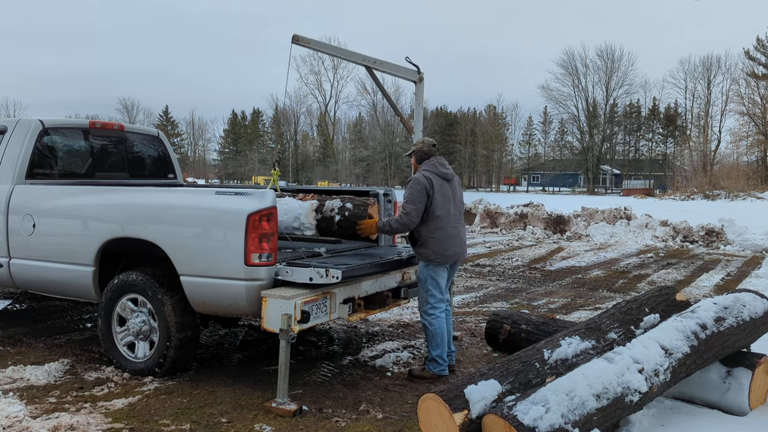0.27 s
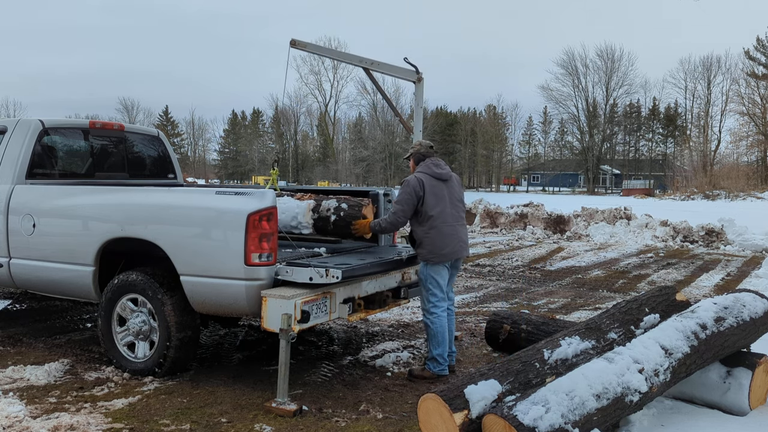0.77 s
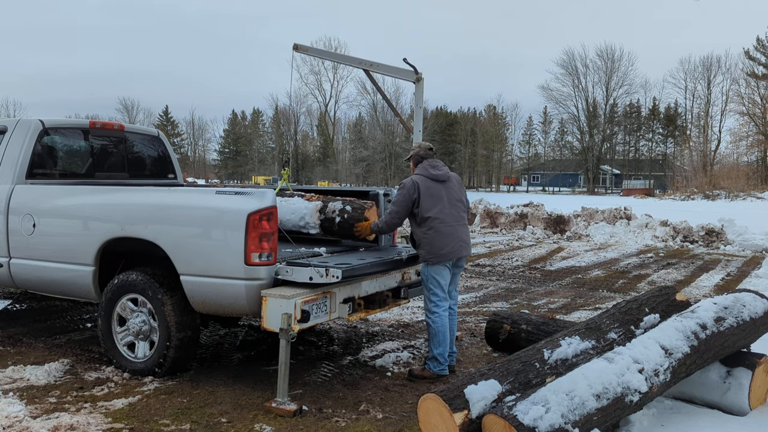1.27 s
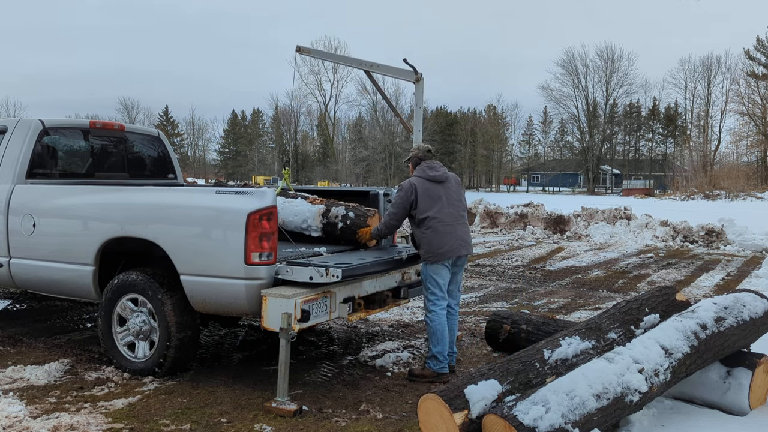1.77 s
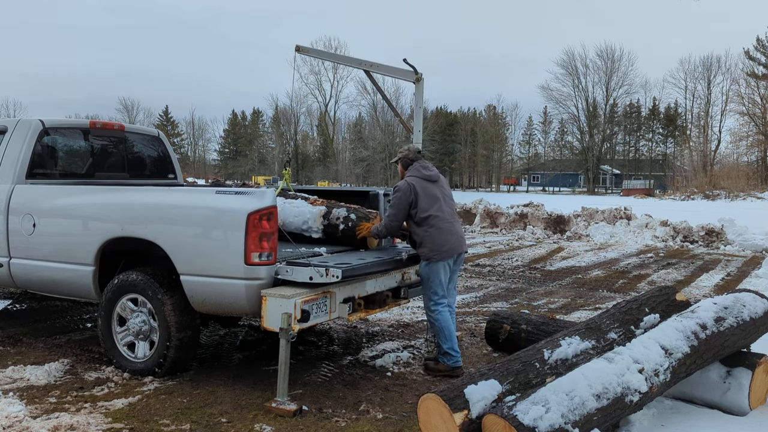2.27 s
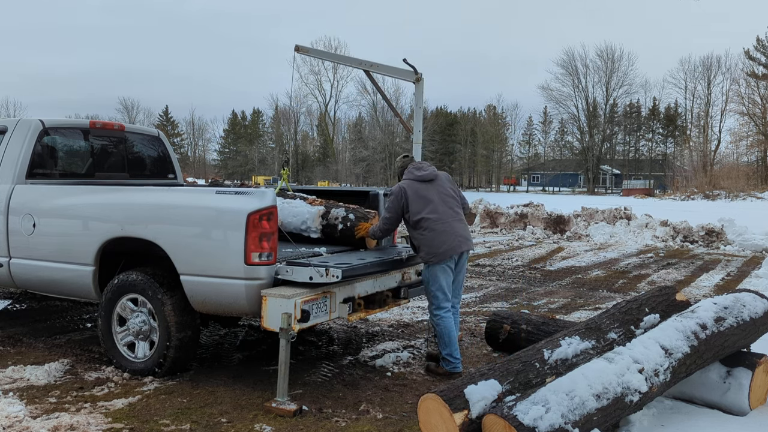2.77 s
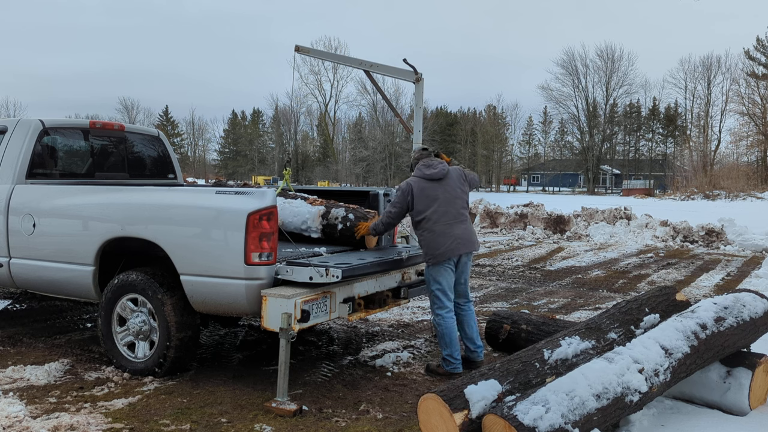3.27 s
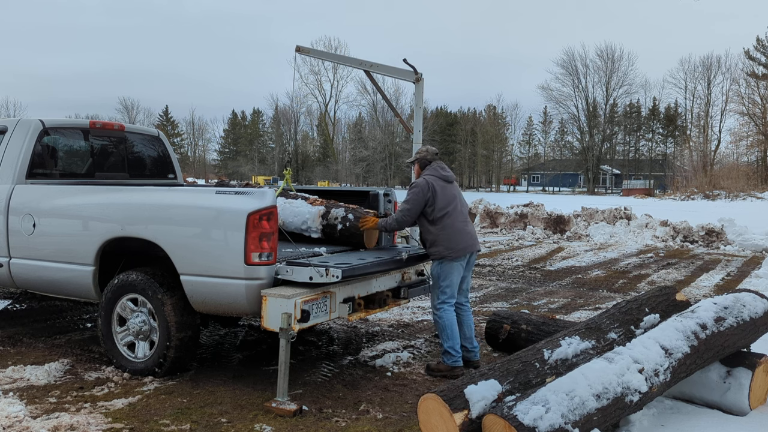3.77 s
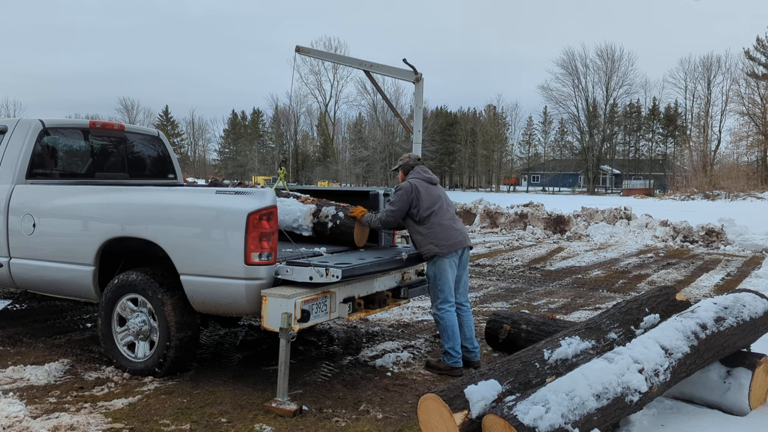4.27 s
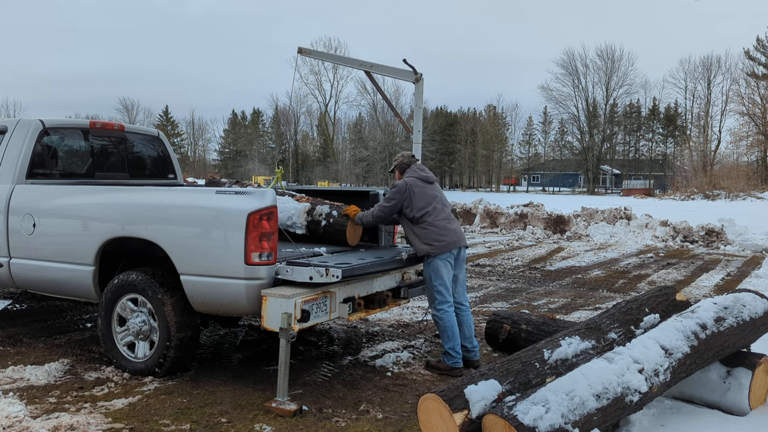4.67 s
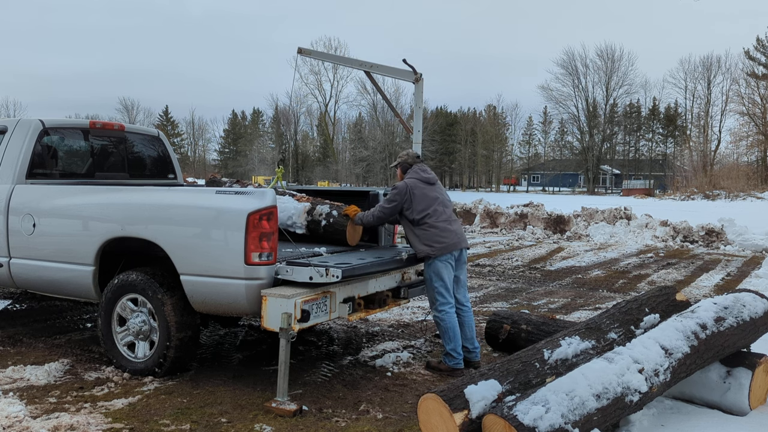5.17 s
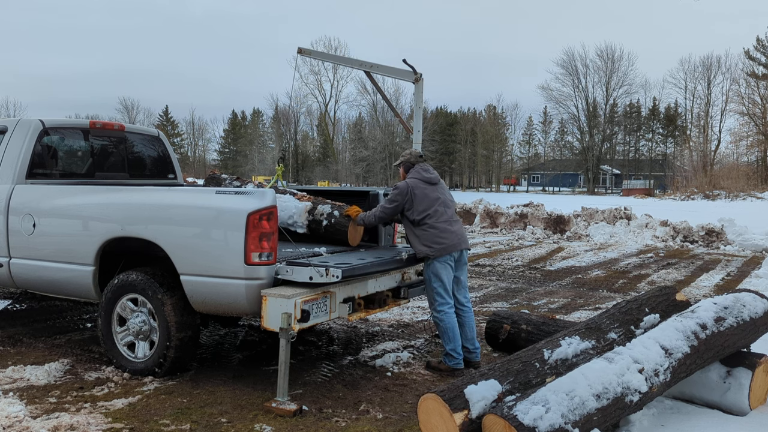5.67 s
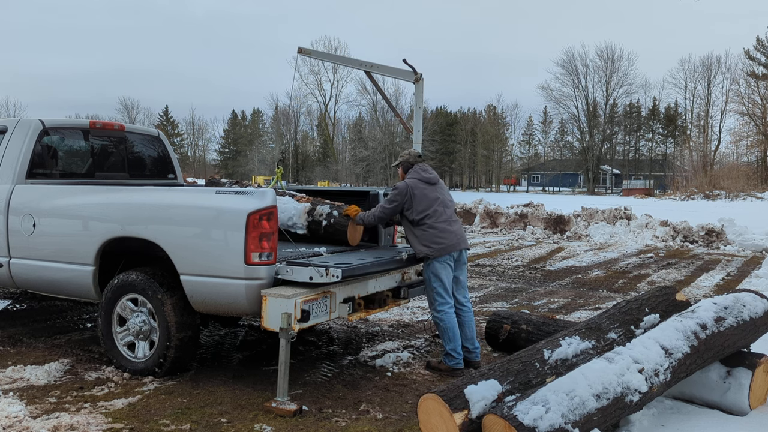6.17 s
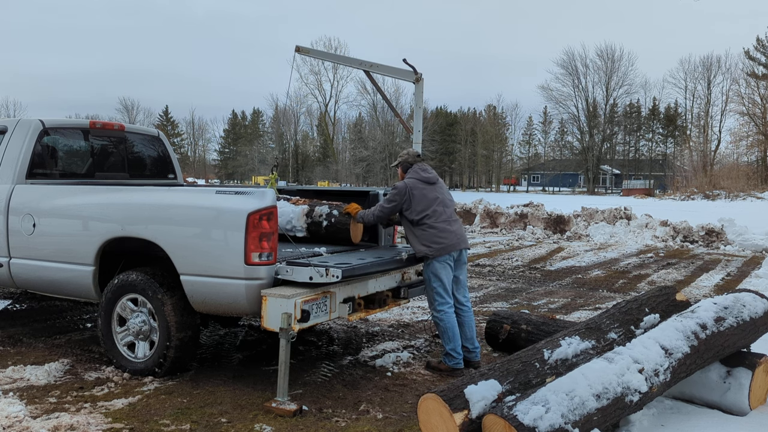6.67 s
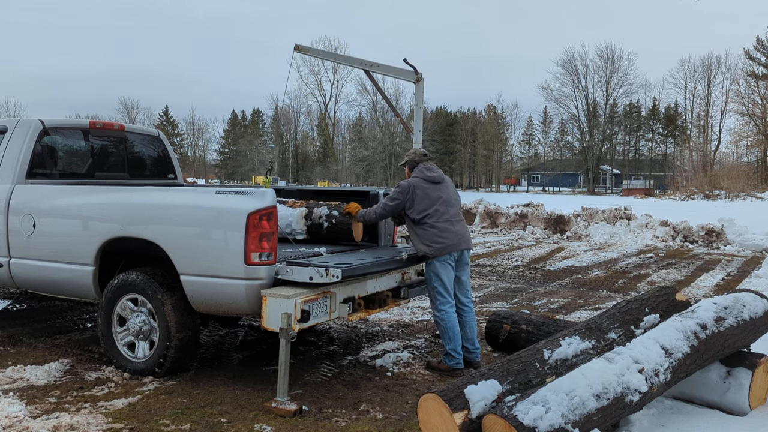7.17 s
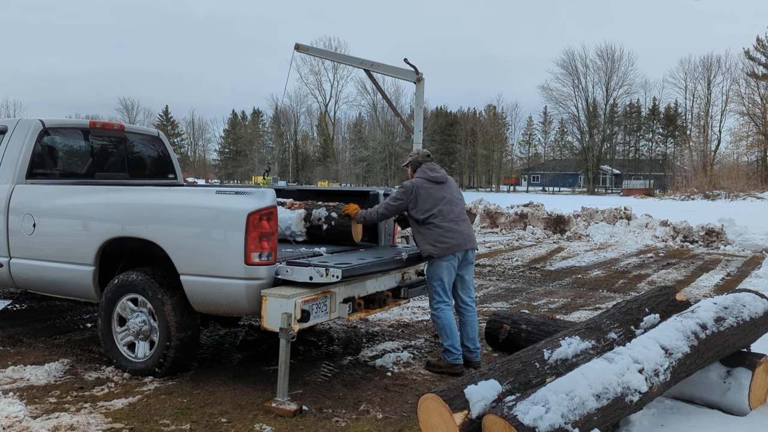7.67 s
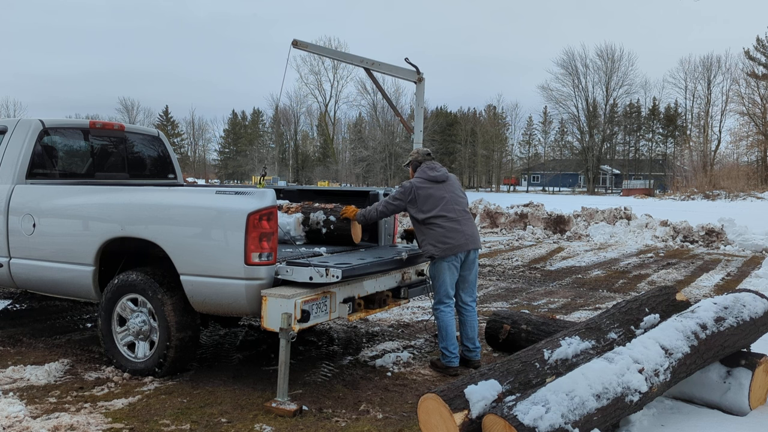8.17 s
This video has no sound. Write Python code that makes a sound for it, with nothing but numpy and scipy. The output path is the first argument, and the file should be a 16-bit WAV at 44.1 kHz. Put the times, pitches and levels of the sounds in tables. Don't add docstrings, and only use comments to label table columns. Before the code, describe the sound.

A large pickup engine idles throughout, a low uneven burble near 42 firings per second, wavering slightly, with soft fan and valve hiss and faint deep rumble. The place is open and snowy, heard in stereo from a few metres. From 1.3 to 2.1 s a log tumbles on the truck bed: quick hollow knocks, dull thuds, gritty bark and tiny clinks. Sparse soft snow crunches and lighter bumps follow, notably at 3.6 and 4.4 s. At 5.1 s a relay clack and bright metal clink start a small electric winch, a coarse low whine until 5.5. It restarts at 5.96 with a sharp knock, climbing in pitch with rattling gears and a brief squeal around 6.7, sagging near 6.9, stopping at 7.14 after a clink. From 7.5 it whines again, somewhat quieter and rising, through a firm log knock and chain clinks at 8.0, still running at the 8.4 s end.

```python
import sys
import numpy as np
from scipy import signal
from scipy.fft import rfft, irfft, next_fast_len
from scipy.io import wavfile
from scipy.ndimage import uniform_filter1d

SR = 44100
rng = np.random.default_rng(int(sys.argv[2]) if len(sys.argv) > 2 else 0)


def magnitude_from_level(level_db):
    exponent = np.asarray(level_db, float) / 20
    return 10 ** exponent


def transcribe(signal):
    frames = np.atleast_2d(signal).T
    limited = np.clip(frames, -1, 1)
    pcm = np.round(limited * 32767).astype(np.int16)
    wavfile.write(sys.argv[1], SR, pcm)


N = 371322
TIME = np.arange(N) / SR

# time_s, firing_rate_hz, exhaust_level_db
IDLE = [(0.0, 42.13, -36.1), (0.6, 42.34, -36.0), (1.1, 42.17, -35.9), (2.0, 42.37, -35.8),
        (2.9, 42.4, -36.9), (3.4, 40.32, -38.2), (3.8, 42.89, -35.6), (4.3, 42.21, -38.6),
        (5.0, 41.65, -37.8), (5.45, 39.88, -38.2), (6.05, 41.5, -37.8), (6.4, 41.61, -38.5),
        (6.6, 40.84, -38.3), (7.0, 41.59, -37.7), (7.2, 41.58, -38.2), (7.5, 42.87, -37.0),
        (7.8, 41.92, -37.7), (8.42, 39.04, -39.0)]
# strength_db, lateness_ms
CYLINDERS = [(6.4, 3.49), (-2.0, 4.98), (3.2, 2.61), (1.8, 4.86), (-12.8, 0.01), (4.2, 2.85), (-3.6, 4.89),
             (2.9, 1.88)]
# pitch_hz, width_hz, level_db,
# polarity
EXHAUST_MODES = [(42, 10, -26.5, -1), (88, 6, 0, -1), (102.3, 48, -9, 1), (129.8, 9.6, -1.2, -1),
                 (165, 4.3, -31.5, 0.9), (181.4, 6.7, -25.5, 0.91), (220.1, 18.6, -11.5, -0.85),
            (279.1, 11.8, -20, 0.73), (421, 13, -33.5, 0.41)]
# pitch_hz, width_hz, level_db
GAS = [(66.4, 4.2, -10), (129, 33, -8), (216, 52, -2), (270.3, 63, -7), (435.2, 13.8, -9.5)]
# pitch_hz, level_db (per Hz)
ENGINE_BAY = [(180, -27), (300, -3), (405, -9), (440, -0.5), (478, -14), (519, -13.5), (620, -9),
              (820, -11.5), (930, -17), (2790, -21.5), (3190, -30.5), (6620, -39), (9550, -49.5),
              (15000, -47.5), (16000, -57)]
# start_s, knock_db, thud_db, length_s
LOG_BUMPS = [(1.284, -42.5, -40, 0.014), (1.349, -50, -54, .022), (1.441, -31, -29.5, 0.014),
             (1.456, -31, -26, 0.011), (1.472, -36, -33, 0.03), (1.515, -49, -38.5, 0.087),
             (1.553, -35.5, -40.5, 0.02), (1.596, -40, -33, 0.019), (1.613, -35.5, -33.5, 0.037),
             (1.64, -32, -40, 0.016), (1.657, -40, -34.5, 0.013), (1.689, -41.5, -41, 0.08),
             (1.786, -37.5, -44, 0.013), (1.844, -43, -50, .02), (1.898, -42, -39, 0.029),
             (1.97, -52, -55, 0.099), (2.027, -45.5, -55, 0.089), (2.115, -45.5, -56, 0.27),
             (2.167, -53, -61, 0.07), (3.639, -37.5, -40, 0.065), (3.694, -63, -53, 0.017),
             (4.424, -47, -39, 0.031), (5.983, -25, -33, 0.018), (7.972, -25.5, -28, 0.026),
             (8.016, -31, -28.5, 0.054), (8.049, -33, -35.5, 0.076)]
# start_s, crunch_db, length_s
SNOW_STEPS = [(0.087, -61.5, 0.041), (1.28, -54.5, 0.011), (1.45, -56.5, 0.038), (1.628, -55, 0.025),
              (1.912, -67, .03), (1.976, -70.5, 0.1), (2.092, -66, .06), (2.4483, -71, .036),
              (2.59, -73, .027), (3.474, -73, .02), (3.843, -67, .012), (3.923, -65, 0.057),
              (3.985, -59, 0.044), (4.207, -67.5, 0.068), (4.384, -71, 0.038), (4.451, -66, 0.015),
              (4.773, -64, 0.041), (7.98, -56, 0.11)]
# knock_db, thud_db, crunch_db, length_s
RELAY = (-31, -48, -46, .011)
# pitch_hz, width_hz, level_db
WOOD = [(680, 90, -2.5), (1090, 70, 2.5), (1650, 90, -7.5), (2710, 120, -12.5)]
# start_s, pitch_hz, level_db, fade_s (to -60 dB)
CLINKS = [(1.283, 5500, -46, 0.033), (1.414, 5660, -60, .03), (1.52, 6800, -56, .02),
          (1.64, 7000, -52, .03), (1.772, 3200, -52, .03), (1.787, 2290, -39, .04), (1.836, 3180, -50, .04),
          (2.062, 4160, -49, .04), (5.098, 5650, -34, 0.022), (5.139, 230, -29, 0.22),
          (5.138, 1810, -23, .06), (7.011, 4045, -32, .08), (7.996, 2623, -30, .08),
          (5.49, 5000, -44, 0.04), (5.962, 6650, -50, .04), (7.975, 4200, -38, 0.066),
          (8.03, 4098, -35, 0.055), (8.075, 4310, -39, 0.051)]
# switch_on_s, switch_off_s, spin_up_s, gear_tone_db, mast_ring_db
WINCH_RUNS = [
    (5.095, 5.49, .028, -3.5, -19),
    (5.959, 7.14, .042, 4, -27.5),
    (7.496, 8.6, .035, -2.5, -12),
]
# time_s, mesh_rate_hz, level_db, tone_db
GEAR_MESH = [
    [(5.1, 273, -28, -1), (5.2, 272.9, -28.5, 0), (5.3, 271.8, -28, -1), (5.38, 271, -29.5, 0),
     (5.48, 275.1, -26.5, 2.5)],
    [(5.96, 399.2, -27, -6), (6.05, 403.2, -26.5, 1.5), (6.15, 412.7, -26.5, -3), (6.33, 416.1, -26, -0.2),
     (6.4, 429.7, -30, 1), (6.47, 436, -26, 0.5), (6.55, 448.4, -26.5, 1.5), (6.62, 459, -25, 0.5),
     (6.7, 468.7, -25.5, 1.5), (6.87, 469, -24.5, -0.2), (6.93, 425.8, -24.5, 5), (6.98, 436, -23, -1.5),
     (7.05, 452.2, -26, -1), (7.14, 457, -25, -4)],
    [(7.5, 398, -33.5, -2), (7.58, 399.6, -27, -2), (7.65, 408, -30, -2), (7.75, 415.2, -29, 1),
     (7.85, 421, -27, 3.5), (7.95, 425.7, -27.5, .1), (8.05, 439, -28, -0.5), (8.13, 451.3, -28, -5),
     (8.2, 461.6, -32, -3), (8.28, 470.5, -31.5, 2), (8.42, 479.4, -29.5, -2.5)],
]
TEETH_DB = [-2, 4, 2, 0.5, 0.5, 1.5, 2, 2, 2.5, 0, 0, -0.5, -1.5, -4.5, -8.5, -7, -10.5, -11]
# pitch_hz, width_hz, level_db
CRANE_SLACK = [(247, 16, 0.5), (554, 59, -9.5), (808, 33, -3.5), (1093, 59, -2), (1371, 30, 2.5),
               (1627, 24, -25), (1846, 52, -6), (2180, 50, -12), (2367, 45, -11), (2710, 60, -15),
               (3260, 37, -13), (4100, 53, -8)]
CRANE_HAULING = [(415, 40, -11.5), (818, 22, 1), (1266, 58, -3), (1758, 53, 7.5), (1866, 40, -5.5),
                 (2350, 19, -5.5), (2604, 150, -10.5), (3290, 80, -13), (3606, 60, -19.5), (4060, 70, -9),
                 (4720, 80, -18.5), (5000, 180, -41), (5560, 59, -39), (6160, 670, -31), (6350, 49, -32),
                 (6840, 450, -37)]
CRANE_LOADED = [(436, 50, -9.5), (823, 35, -6), (1270.3, 43, -1.5), (1753, 78, 1.5), (2360, 40, -9),
                (2604, 39.7, -3.5), (3360, 35, -16.5), (4100, 100, -12), (4760, 60, -17), (6400, 280, -26)]
# pitch_hz, level_db (per Hz)
RATTLE = [(120, -2), (200, -7.5), (227, 2.5), (283, -16), (683, -4), (806, -3), (1020, -4), (1270, -5),
          (1500, -6), (1770, 2), (1980, -14.5), (2420, -3.5), (3020, -10.5), (4120, -15), (7300, -23.5),
          (8000, -30), (12000, -39.5), (13300, -47.5), (15600, -38)]

ENGINE_LEAD, EXHAUST_LEAD, WINCH_LEAD, BUMP_LEAD = 12, 4, 4, 1


def curve(rows):
    s, *columns = np.transpose(rows)
    return [np.interp(TIME, s, c) for c in columns]


def unit(x):
    return x / np.sqrt(np.mean(x ** 2))


def hold(x, db):
    slow_power = uniform_filter1d(x ** 2, size=SR // 2)
    return x * magnitude_from_level(db) / np.sqrt(slow_power + 1e-18)


def ring(x, hz, width):
    return signal.lfilter(*signal.iirpeak(hz, hz / width, SR), x)


def body(x, modes):
    return sum((-1) ** k * magnitude_from_level(db) * ring(x, hz, width) for k, (hz, width, db) in enumerate(modes))


def band(x, lo_hz, hi_hz):
    edges = [lo_hz, min(hi_hz, .45 * SR)]
    return signal.sosfilt(signal.butter(2, edges, "band", fs=SR, output="sos"), x)


def low(x, order, hz):
    return signal.sosfiltfilt(signal.butter(order, hz, fs=SR, output="sos"), x)


def colour(x, spectrum):
    hz, db = np.transpose(spectrum)
    size = next_fast_len(N)
    bins_hz = np.arange(size // 2 + 1) * SR / size
    gain = magnitude_from_level(np.interp(np.log(bins_hz + 1), np.log(hz), db))
    return irfft(rfft(x, size) * gain, size)[:N]


def walk(rate):
    k = int(SR / rate)
    steps = np.repeat(rng.standard_normal(N // k + 1), k)
    return 1.34 * uniform_filter1d(uniform_filter1d(steps, k), k)[:N]


def place(x, lead, pan_db, treble_db=0.):
    left = x
    if treble_db:
        left = x + (magnitude_from_level(treble_db) - 1) * band(x, 2500, 8200)
    right = np.pad(x, (lead, 0), mode="edge")[:N]
    return np.array([left * magnitude_from_level(pan_db / 2), right * magnitude_from_level(-pan_db / 2)])


def cylinder_firings(hz):
    phase = np.cumsum(hz) / SR
    at = np.flatnonzero(np.diff(np.floor(phase)))
    cylinder = np.floor(phase[at + 1]).astype(int) % 8
    strength_db, late_ms = np.transpose(CYLINDERS)[:, cylinder]
    chance = rng.standard_normal((400, 2))[:len(at)].T
    late = ((late_ms + .12 * chance[0]) * SR / 1000).astype(int)
    firings = np.zeros(N)
    firings[np.clip(at + late, 0, N - 1)] = magnitude_from_level(strength_db + .8 * chance[1])
    cycle = at[7]
    firings[:cycle] = firings[cycle:2 * cycle]
    return firings, cycle


def exhaust():
    hz, level_db = curve(IDLE)
    off_hz = hz - 42
    boom_db = level_db - 1.7 * off_hz
    pipe_db = level_db + 4 + 3 * off_hz
    firings, cycle = cylinder_firings(hz)
    warm = np.concatenate([firings[:cycle], firings])
    pipe = sum(sign * magnitude_from_level(db) * ring(warm, f, width)[cycle:] for f, width, db, sign in EXHAUST_MODES)
    pipe = low(pipe, 2, 480)
    boom = low(pipe, 3, 97)
    tone = hold(boom, boom_db - .6) + hold(pipe - boom, pipe_db - 1.5)
    puff = uniform_filter1d(uniform_filter1d(firings, size=500), size=300)
    gas = band(body(puff * rng.standard_normal(N), GAS), 30, 1200)
    return place(tone + magnitude_from_level(pipe_db - 13.0) * unit(gas), EXHAUST_LEAD, 1.55)


def engine_bay():
    near, left, right = (colour(rng.standard_normal(N), ENGINE_BAY) for _ in range(3))
    level_db = -54.5 + 0.2 * walk(0.17) + .5 * walk(27)
    scale = magnitude_from_level(level_db) / np.std(band(near, 680, 16000))
    scattered = band(np.array([left, right]), 740, 18000)
    return scale * (place(near, ENGINE_LEAD, .6) + 0.8 * scattered)


def rumble():
    deep = band(rng.standard_normal(N), 36, 55)
    return place(magnitude_from_level(-57) * unit(deep), EXHAUST_LEAD, 0.9)


def bump_list():
    rows = [(s, db, thud_db, db - 32.5, length, 1) for s, db, thud_db, length in LOG_BUMPS]
    rows += [(s, db + 15, db + 7, db, length, 1.6) for s, db, length in SNOW_STEPS]
    rows += [(run[0], *RELAY, 1) for run in WINCH_RUNS]
    return rows


def struck_wood(scrape, panel_hz):
    struck = 1.14 * band(band(scrape, 800, 3900), 800, 3900)
    struck += magnitude_from_level(-14) * band(scrape, 2900, 6200)
    struck += ring(scrape, panel_hz, 0.032 * panel_hz)
    return struck + magnitude_from_level(5.5) * body(scrape, WOOD)


def bumps():
    grit = rng.standard_normal((4, N)) * magnitude_from_level(1.6 * rng.exponential(size=(4, N))) * magnitude_from_level(1.8 * walk(120))
    knock, fades = np.zeros(N), np.zeros((2, N))
    rows = bump_list()
    pitch_hz = 2180 * np.exp(0.34 * rng.standard_normal(len(rows)))
    for (s, knock_db, thud_db, crunch_db, length, shape), panel_hz in zip(rows, pitch_hz):
        start = int(s * SR)
        age = np.arange(min(int(.3 * SR), N - start)) / SR
        span = slice(start, start + len(age))
        rise_s = 0.0014 if shape == 1 else .2 * length
        fade = (1 - np.exp(-age / rise_s)) * np.exp(-(age / max(length, .004)) ** shape)
        struck = struck_wood(grit[0, span] * fade, panel_hz)
        knock[span] += magnitude_from_level(knock_db - 5.5) * struck * np.std(fade) / np.std(struck)
        fades[:, span] += magnitude_from_level(np.array([[thud_db], [crunch_db]])) * fade
    thud_level, crunch_level = np.sqrt(np.mean(fades ** 2, axis=1))
    thud = thud_level * unit(band(fades[0] * grit[1], 71, 565))
    crunch = np.array([band(fades[1] * (grit[2] + 1.1 * g), 4600, 19000) for g in (grit[3], -grit[3])])
    crunch *= crunch_level / np.std(crunch)
    return place(knock + magnitude_from_level(0.5) * thud, BUMP_LEAD, 1.0) + magnitude_from_level(7.5) * crunch


def clinks():
    out = np.zeros(N)
    age = np.arange(SR // 10) / SR
    for s, hz, db, t60 in CLINKS:
        pair = np.sin(2 * np.pi * hz * age) + 0.65 * np.sin(2 * np.pi * 0.94 * hz * age)
        fade = magnitude_from_level(db - 60 * age / max(t60, .005)) * (1 - np.exp(-age / 0.00071))
        start = int(s * SR)
        out[start:start + len(age)] += pair * fade
    return place(out, BUMP_LEAD, .4)


def winch_motion():
    out = np.zeros((5, N))
    out[0], out[1] = 200, -120
    for (on, off, spin_s, gear_db, mast_db), rows in zip(WINCH_RUNS, GEAR_MESH):
        hz, level_db, clean_db = curve(rows)
        age, coast = np.maximum(TIME - on, 0), np.maximum(TIME - off, 0)
        hz = hz * (1 - .31 * np.exp(-age / spin_s)) - 800 * coast
        hz = np.maximum(hz, 100)
        drop_hz = np.maximum(-np.gradient(hz), 0)
        dragged_hz = signal.lfilter([1], [1, -np.exp(-1 / (0.066 * SR))], drop_hz)
        tone_db = gear_db + clean_db - 0.7 * dragged_hz
        level_db = level_db - 16.5 * np.exp(-age / (0.42 * spin_s))
        out = np.where(TIME >= on, [hz, level_db, tone_db, mast_db + 0 * hz, coast], out)
    return out


def gear_teeth(turn, shaft):
    mesh = turn + 0.11 * np.sin(3 * shaft)
    teeth = np.zeros(N)
    for k, db in enumerate(TEETH_DB):
        blur = (0.18 + 0.059 * k) * walk(60)
        teeth += magnitude_from_level(db + 2.25 * walk(25)) * np.cos((k + 1) * mesh + blur)
    return magnitude_from_level(3.5 * np.cos(shaft)) * teeth


def crane_frame(teeth):
    run = np.searchsorted([WINCH_RUNS[1][0], WINCH_RUNS[2][0]], TIME)
    frames = [unit(body(teeth, modes)) for modes in (CRANE_SLACK, CRANE_HAULING, CRANE_LOADED)]
    return np.choose(run, frames)


def motor_commutator(turn, hz):
    cap = magnitude_from_level(-24) / (1 + ((15 * hz - 6470) / 140) ** 2)
    return magnitude_from_level(3.0 * walk(25)) * np.cos(15 * turn) * (magnitude_from_level(-0.0796 * hz) + cap)


def drum_squeal():
    start_s, end_s = 6.64, 6.895
    locked = uniform_filter1d(1. * (TIME > start_s) * (TIME < end_s), size=int(0.049 * SR))
    drum_hz = 2352 - 45 * np.exp(-np.maximum(TIME - start_s, 0) / .05) + 5 * walk(30)
    return magnitude_from_level(2.0 * walk(20) - 4) * locked * np.cos(2 * np.pi * np.cumsum(drum_hz) / SR)


def loose_clicks(shaft):
    clicks = rng.standard_normal(N) * magnitude_from_level(1.5 * rng.exponential(size=N)) * magnitude_from_level(1.5 * walk(30))
    place_on_wheel = (shaft / (2 * np.pi) * 4096).astype(int) % 4096
    worn = rng.standard_normal(4096)[place_on_wheel]
    repeat_share = 0.68
    return np.sqrt(1 - repeat_share) * unit(clicks) + np.sqrt(repeat_share) * worn * magnitude_from_level(0.93 * walk(15))


def winch():
    hz, level_db, tone_db, mast_db, coast = winch_motion()
    turn = 2 * np.pi * np.cumsum(hz * (1 + 0.00387 * walk(40))) / SR
    shaft = turn / 16.3
    teeth = gear_teeth(turn, shaft)
    gears = unit(crane_frame(teeth) + magnitude_from_level(-9.0) * unit(colour(teeth, RATTLE)))
    whine = gears + motor_commutator(turn, hz) + drum_squeal()
    whine += magnitude_from_level(mast_db) * unit(ring(teeth, 474.2, 23))

    clicks = loose_clicks(shaft)
    rattle = colour(clicks, RATTLE)
    rattle /= np.std(band(rattle, 426, 4350))
    mids = band(rattle, 524, 3180) + magnitude_from_level(-7.0) * unit(body(clicks, CRANE_HAULING))
    mids += magnitude_from_level(-18.5) * unit(ring(clicks, 4080, 59))

    coast_db = -350 * coast
    sound = magnitude_from_level(coast_db) * (magnitude_from_level(0.75) * mids + magnitude_from_level(tone_db) * whine)
    hiss_db = -6.5 - 0.36 * np.maximum(level_db + 28.5, -12) - 480 * coast
    sound += magnitude_from_level(hiss_db) * unit(band(rattle, 2700, 26000))
    sound += magnitude_from_level(-5.5 - 178 * coast) * unit(band(rattle, 184, 800))
    sound *= magnitude_from_level(level_db)

    scatter = band(np.array([colour(rng.standard_normal(N), RATTLE) for _ in range(2)]), 300, 19500)
    scatter *= magnitude_from_level(level_db - 8.0 + coast_db) / np.std(scatter)
    heard = place(sound, WINCH_LEAD, .2, treble_db=-10.0)
    heard[0] -= 0.27 * band(sound, 900, 2800)
    return heard + scatter


def scene():
    return exhaust() + engine_bay() + rumble() + bumps() + clinks() + winch()


def roll_off(x):
    return signal.sosfilt(signal.butter(12, 16650, fs=SR, output="sos"), x)


def record(dry):
    running = np.pad(dry, ((0, 0), (256, 0)), mode="reflect", reflect_type="odd")
    top_cut = signal.ellip(10, .2, 60, 15830, fs=SR, output="sos")
    cut = signal.sosfilt(top_cut, running)[:, 256:]
    cut = cut - 0.52 * ring(cut, 7880, 830)
    fade_in = np.sin(np.minimum(TIME / .006, 1) * np.pi / 2) ** 2
    return roll_off(cut * fade_in)


dry = scene()
out = record(dry)
transcribe(out)
```